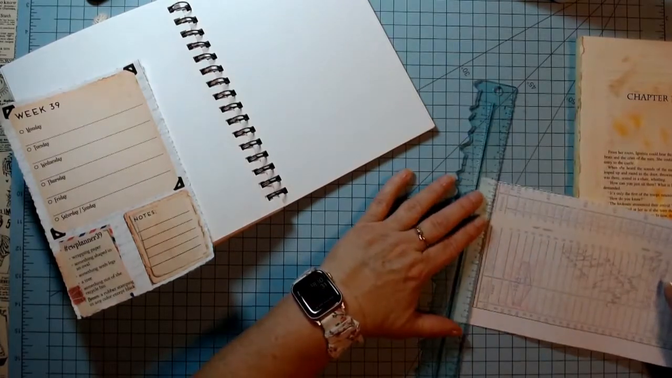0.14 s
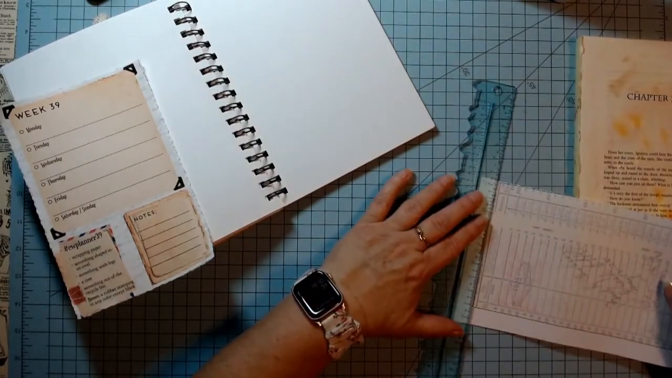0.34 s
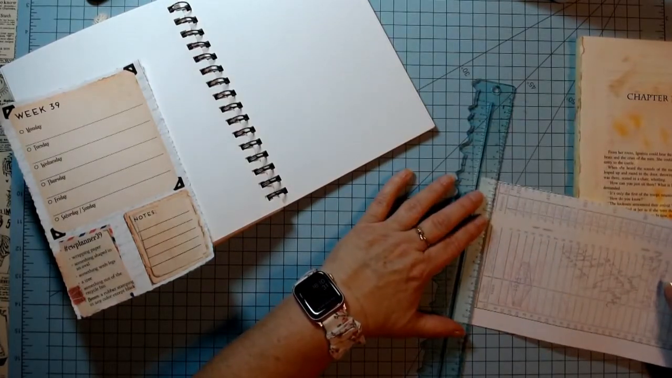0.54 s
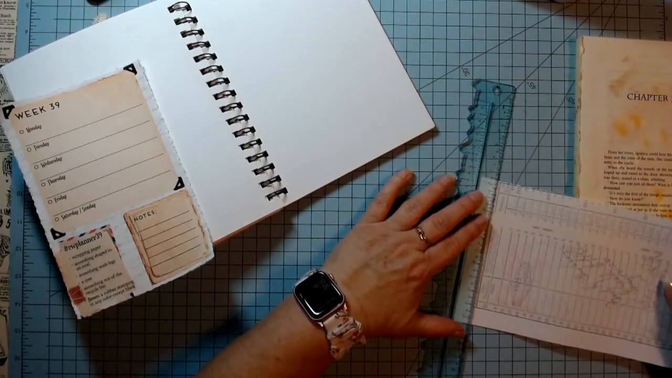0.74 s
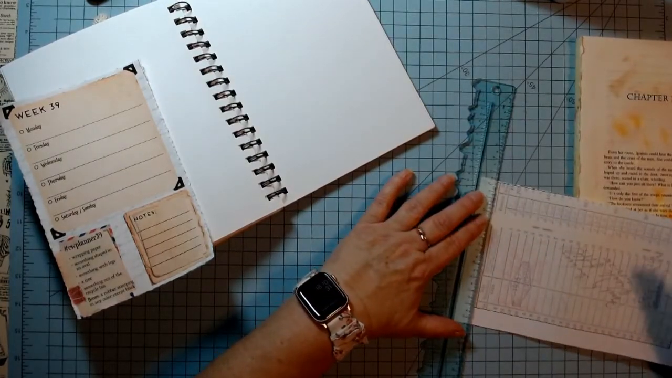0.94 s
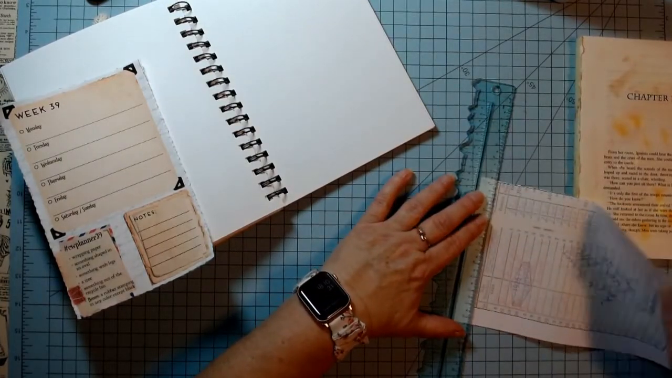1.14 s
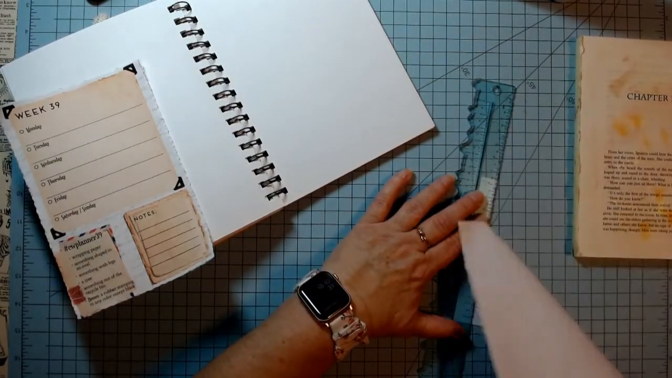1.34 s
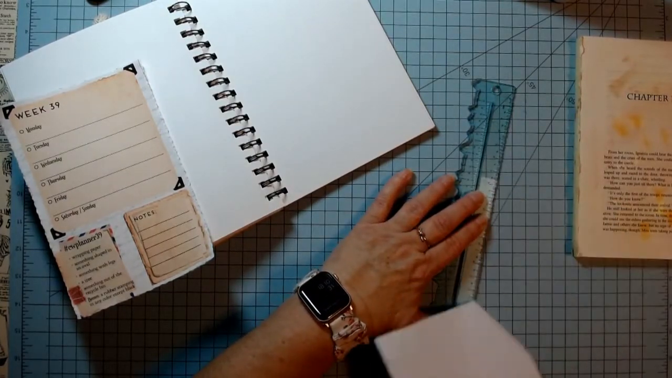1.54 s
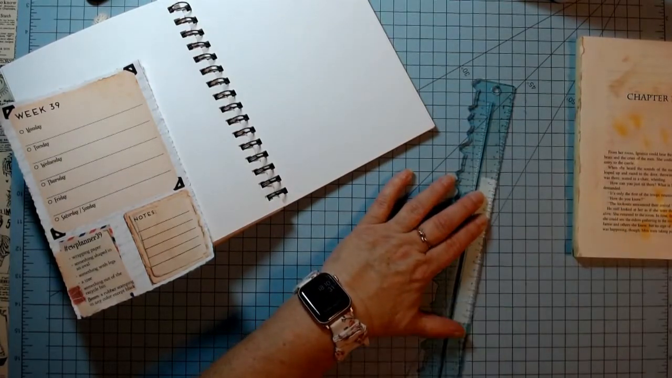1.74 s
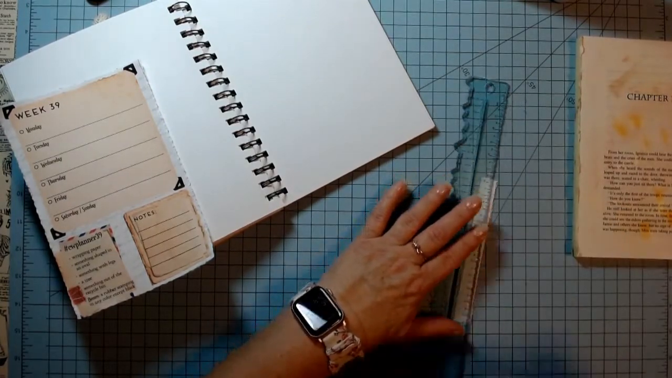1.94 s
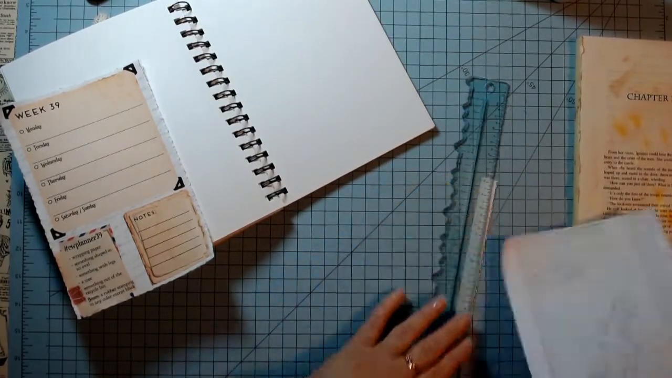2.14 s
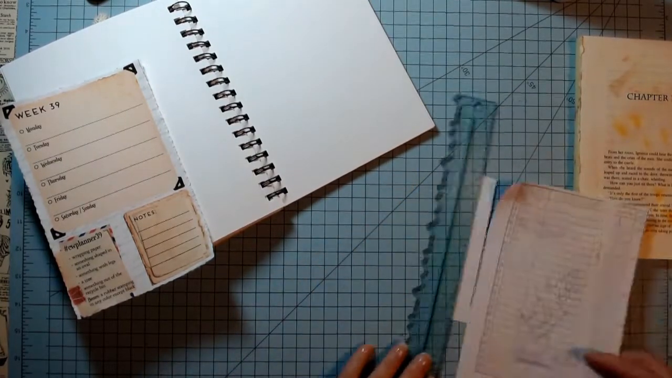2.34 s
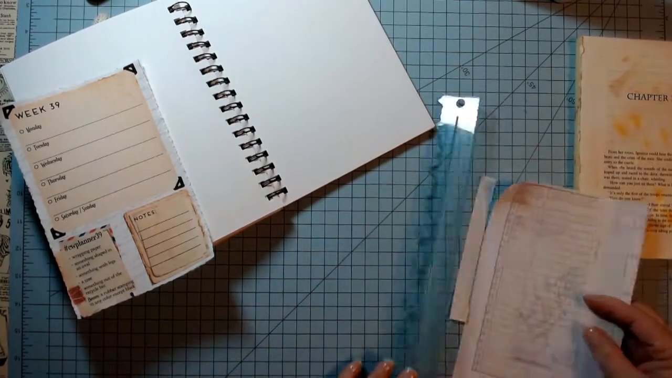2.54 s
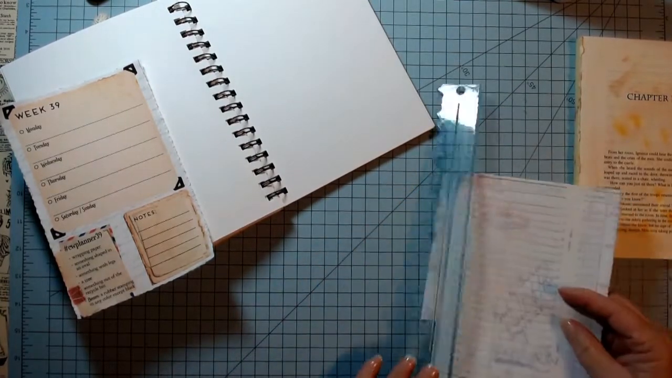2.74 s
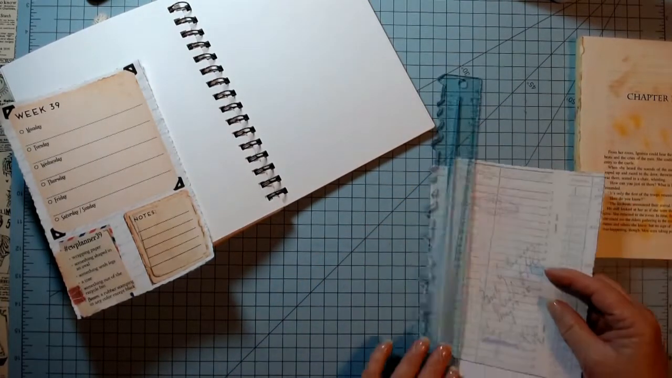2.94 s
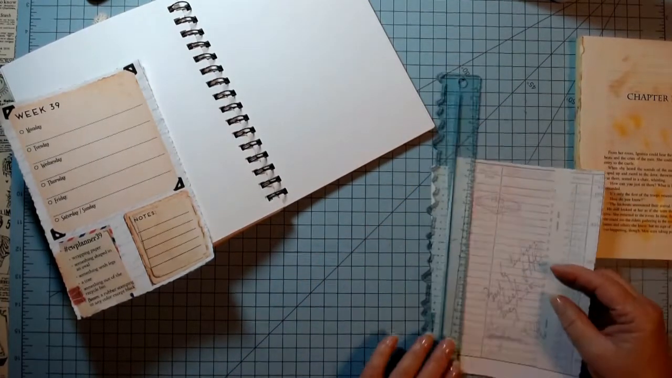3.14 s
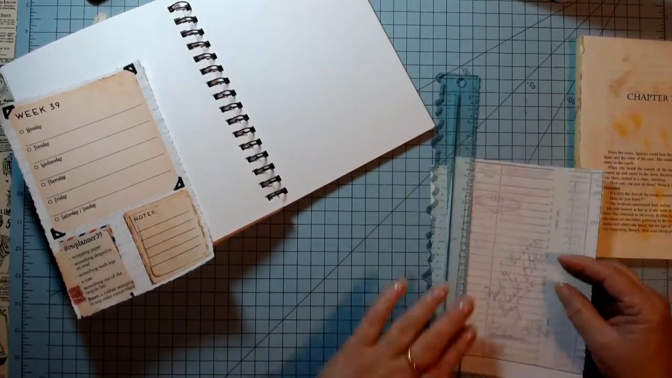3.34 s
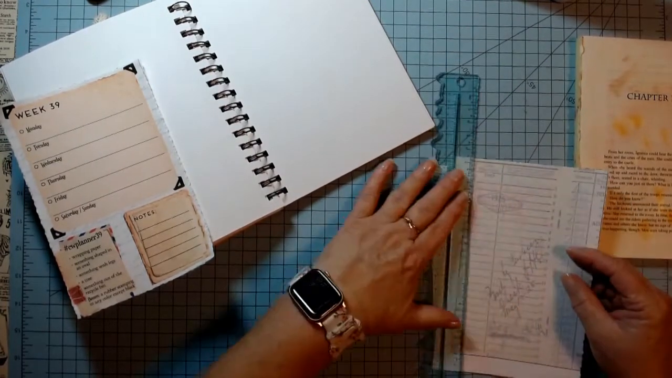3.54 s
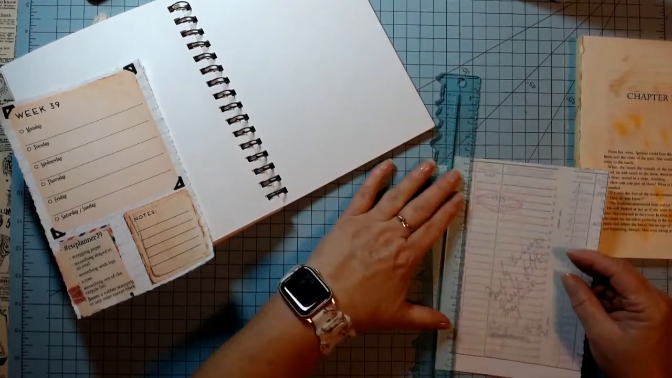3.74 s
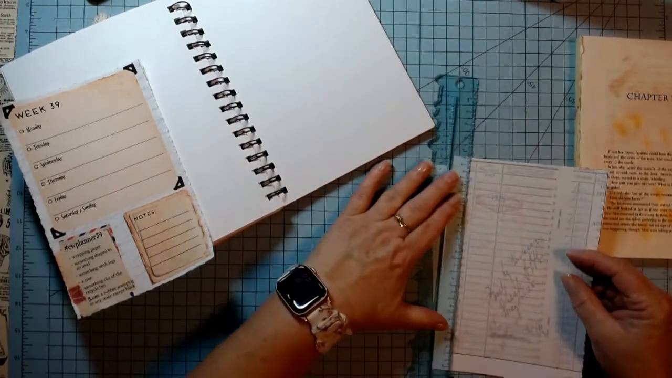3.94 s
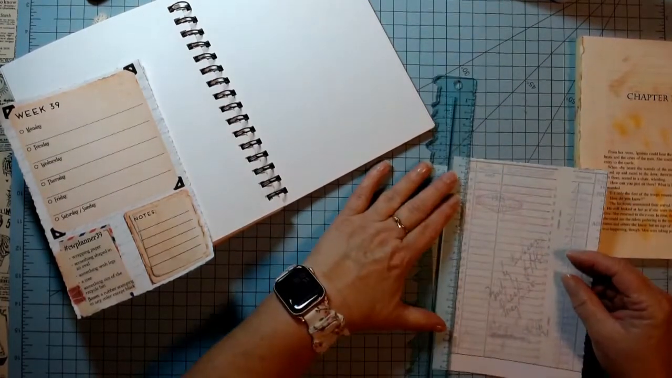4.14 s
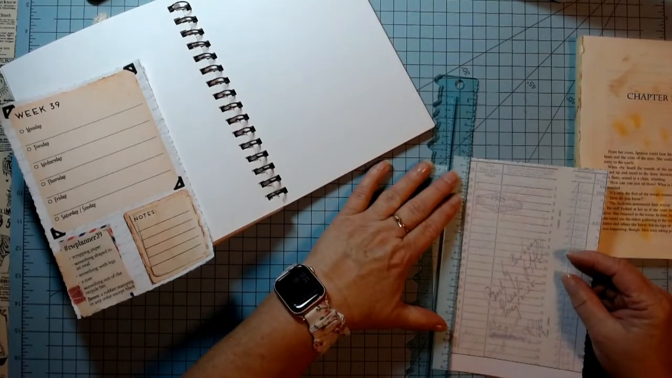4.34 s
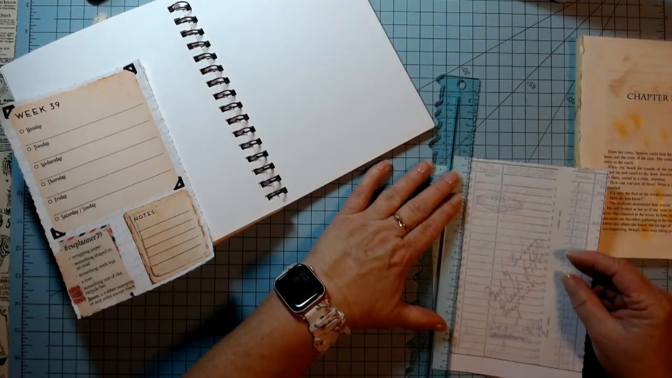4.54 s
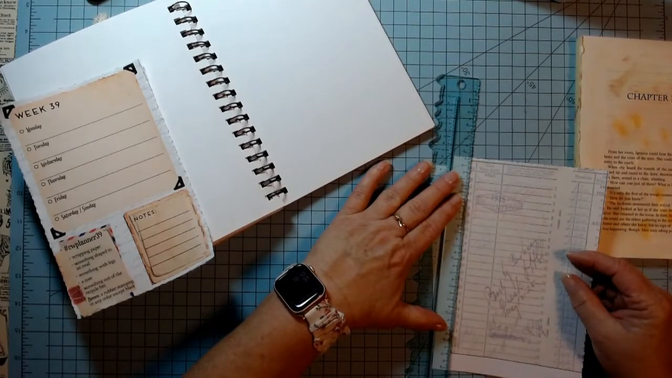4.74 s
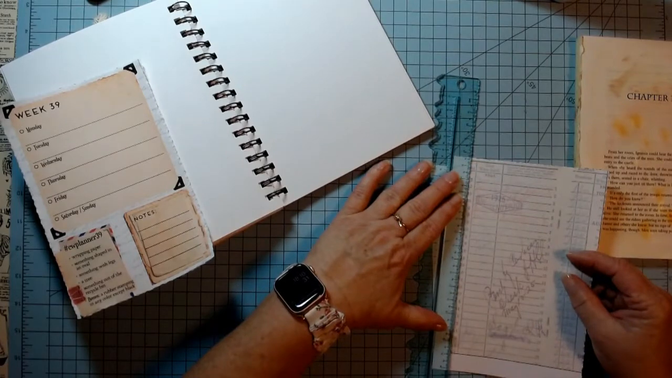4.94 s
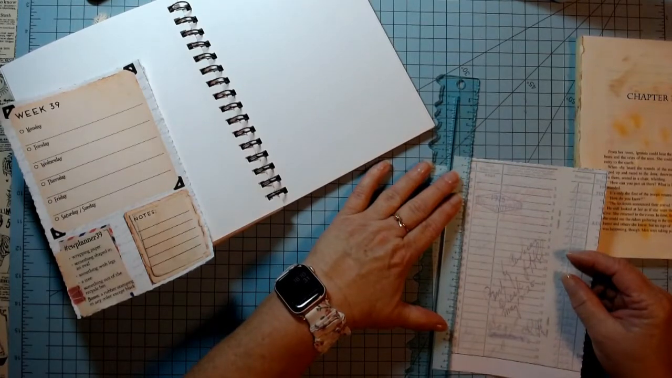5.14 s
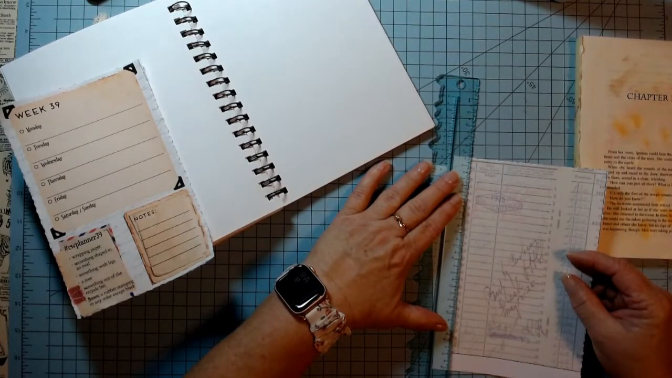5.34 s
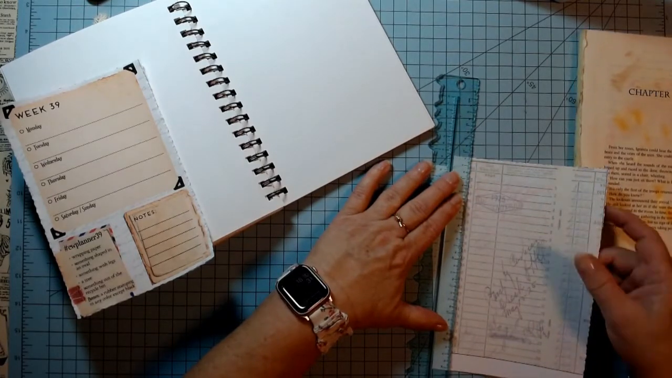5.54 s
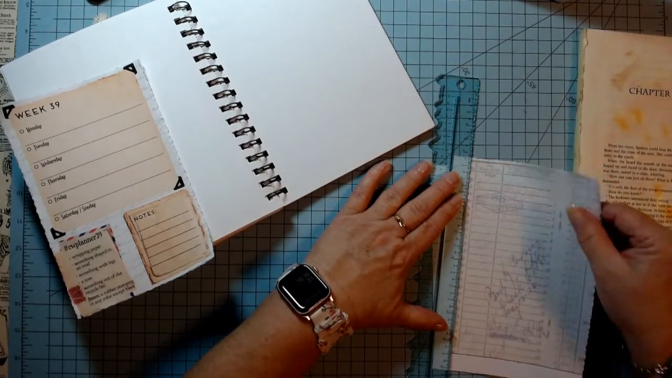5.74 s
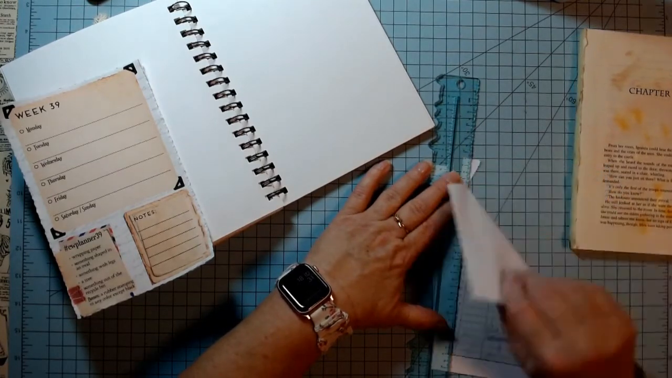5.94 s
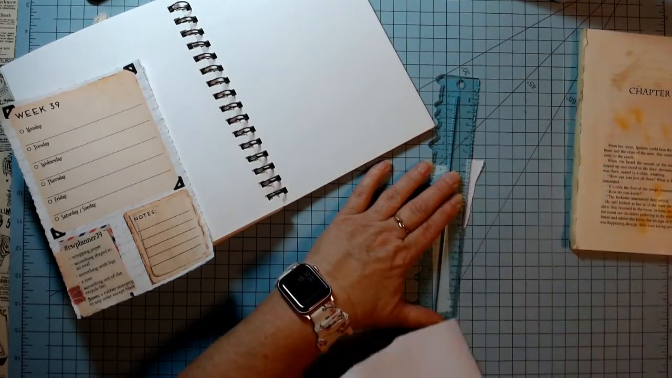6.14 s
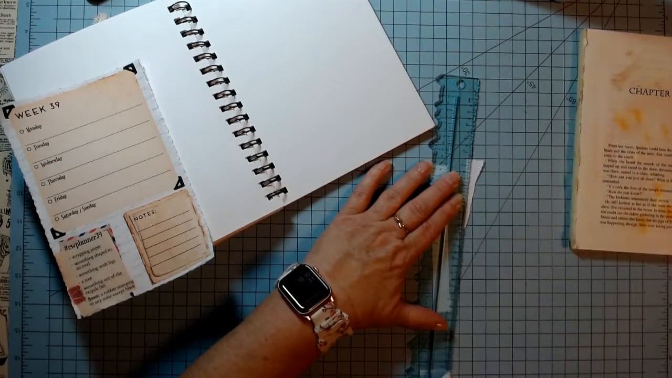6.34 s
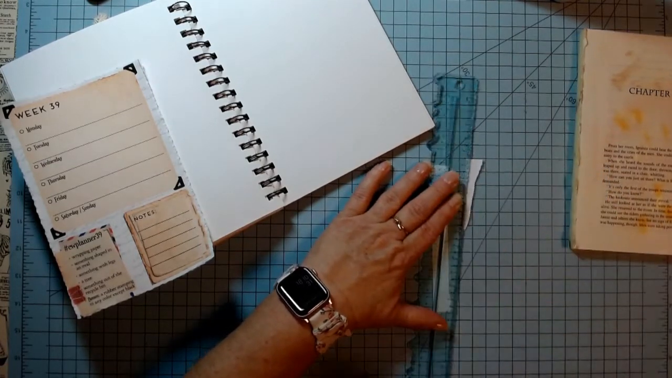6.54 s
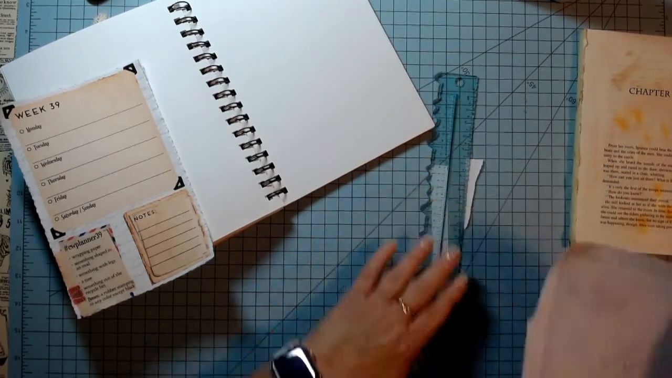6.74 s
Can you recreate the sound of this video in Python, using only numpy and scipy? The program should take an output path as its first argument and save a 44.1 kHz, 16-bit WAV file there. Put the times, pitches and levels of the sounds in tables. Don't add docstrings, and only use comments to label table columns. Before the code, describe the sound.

Close, dry paper tearing: one loud quick rip, small rustles, a single ruler clack, a pause, then a gentler two-part rip and faint rustle.

```python
import sys
import numpy as np
from scipy import signal
from scipy.fft import rfft, irfft, next_fast_len
from scipy.io import wavfile
from scipy.ndimage import uniform_filter1d

SR = 44100
rng = np.random.default_rng(int(sys.argv[2]) if len(sys.argv) > 2 else 0)


def gain_from_decibels(decibels):
    exponent = np.asarray(decibels, float) / 20
    return 10 ** exponent


def bounce(signal):
    frames = np.transpose(np.atleast_2d(signal))
    limited = np.clip(frames, -1, 1)
    pcm = np.round(limited * 32767).astype(np.int16)
    wavfile.write(sys.argv[1], SR, pcm)


N = 299483

# (time [s], crackle level [dB], slack of the sheet [dB])
TEARS = [
    [(1.204, -71, 9), (1.211, -19, -8), (1.245, -21, 0), (1.29, -22, -12), (1.334, -20.5, -5),
     (1.396, -26, -4.5), (1.482, -26, 0), (1.566, -31.5, 3), (1.66, -73.5, 20.5)],
    [(5.78, -53, 1), (5.792, -31.5, 2.5), (5.902, -22.5, 6), (5.944, -24, 2), (6.02, -30, 5),
     (6.056, -29, 5), (6.125, -46, 3)],
    [(6.128, -42, 5), (6.16, -41.5, 8.5), (6.168, -37, 12), (6.264, -42.5, 2), (6.354, -37.5, 4),
     (6.395, -34.5, -12.5), (6.45, -52, 17), (6.5, -74, 13)],
]
HANG_DB = [-4.5, 2, -1.5]
# (time [s], crackle [dB], time to fall 60 dB [s], slack [dB], thump [dB])
JOLTS = [(1.016, -62.5, 0.31, -12, 2), (1.124, -33.5, .14, 0.5, 2.5), (1.175, -66, 0.14, 24, 1.5),
         (1.705, -65, 0.082, 33, -5.5), (1.712, -43, 0.098, 21, -29.5), (1.864, -47.5, 0.14, 6, 3.5),
         (2.01, -41.5, 0.14, -12.5, -28), (2.27, -50.5, 0.35, -1.5, 2.5), (2.793, -59.5, 0.34, -11.5, -7),
         (2.902, -59.5, 0.37, -22, -4.5), (2.994, -35.5, 0.21, 1.5, 12), (3.044, -29.5, 0.053, 1.5, -21),
         (3.238, -73.5, 0.39, -4, 2), (3.435, -63.5, 0.28, -3, 10), (5.43, -41.5, 0.1, -16, 1),
         (6.527, -39, 0.13, -4, -1), (6.714, -61, 0.52, -1, 12.5)]
# (time [s], length [s], crackle [dB], slack [dB])
SLIDES = [(0.574, 0.11, -101, 22), (0.722, 0.092, -69.5, -26), (0.821, 0.12, -75, -12),
          (1.62, 0.14, -72.5, 15.5), (1.73, 0.13, -50.5, 7), (1.876, 0.18, -52.5, -10),
          (2.026, 0.092, -62.5, -17), (2.096, 0.14, -52.5, -5), (2.217, 0.076, -61, 2),
          (2.295, 0.1, -73, 8.5), (2.401, 0.23, -83.5, 10), (2.504, 0.16, -57, -22), (2.66, .1, -86, 15.5),
          (3.072, 0.12, -77, 0), (3.437, 0.072, -70.5, 8.5), (3.712, 0.077, -82.5, -5.5),
          (4.1, 0.52, -90, 7.5), (5.23, 0.092, -71.5, -10.5), (5.295, 0.26, -68, -4),
          (5.466, 0.21, -73, -13), (5.615, 0.071, -67, -7.5), (5.679, 0.15, -82.5, 12),
          (6.544, 0.28, -71, -7)]
RANGE_HZ = [220, 850, 2500, 6500]
# (frequency [Hz], level [dB per Hz])
PAPER = [(50, -27), (90, -19.5), (135, -6.5), (230, -9.5), (310, -3), (450, -7), (600, -5), (900, -2.5),
         (1700, -6), (3000, -8.5), (6500, -14.5), (8000, -26), (12000, -33), (16000, -34)]
TEAR_DB = [-5, -1.6, 1, -4]
TOUCH_DB = [-4, 1.23, 1, -5.5]
PER_SLACK = [0.14, 0.99, 0.14, 0.074]
# (time [s], peak level [dB], ring frequency [Hz])
SNAPS = [(1.13, -35, 1180), (1.132, -22, 490), (1.21, -11, 2830), (1.237, -8, 2860), (1.258, -7, 1604),
         (1.328, -5.5, 3360), (1.706, -32, 821), (1.717, -20, 732), (1.751, -27.5, 745),
         (1.785, -30.5, 880), (1.867, -36.5, 610), (2.281, -31, 1844), (3.441, -51, 1830),
         (3.469, -36, 452), (5.436, -31.5, 3715), (5.791, -13.5, 1243), (5.884, -6.5, 1100),
         (5.935, -21.5, 600), (6.13, -21, 990), (6.165, -18, 940), (6.529, -35, 1320), (6.715, -34.5, 2860)]
# (time [s], peak level [dB])
CLAPS = [
    (2.999, -20.5),
    (3.004, -11),
    (3.007, -23),
    (3.019, -47),
    (3.043, -20),
    (3.052, -43),
]
# (frequency [Hz], level [dB], time to fall 60 dB [s])
RULER = [(210, -7.5, 0.067), (670, -38, 0.17), (1390, -19, 0.069), (1710, -40, 0.17), (2070, -3, 0.36),
         (2690, 4, 0.0093), (4380, -40, 0.058)]
# (time [s], length [s],
# level [dB], frequency [Hz])
RUBS = [(0.613, 0.044, -78, 940), (2.373, 0.13, -79, 2400), (2.68, .07, -79, 2050), (2.8, .06, -70, 2700),
        (2.555, 0.061, -58, 2810), (2.901, 0.031, -62.5, 2690), (3.26, 0.089, -72, 2684),
        (3.431, 0.06, -59, 2074), (3.51, 0.092, -59.5, 378), (3.56, 0.077, -67, 507),
        (3.72, 0.076, -82.5, 2720), (5.141, 0.05, -64.5, 374), (5.233, 0.073, -70.5, 2726),
        (5.254, 0.23, -79.5, 5270), (5.29, 0.063, -73, 1450), (5.299, 0.06, -73.5, 2240),
        (5.493, 0.091, -73, 2670), (5.5, .18, -80, 5300), (1.215, .055, -30, 2837)]
# (time [s], length [s], level [dB], frequency [Hz])
FLAPS = [(1.295, 0.032, -25, 5470), (1.717, 0.019, -42, 2500), (2.275, 0.049, -50.5, 1800),
         (2.79, 0.12, -68.5, 4710), (3.239, 0.039, -71, 4800), (3.5, .06, -74, 2600),
         (5.422, 0.041, -47.5, 2800), (5.432, 0.025, -56, 7200), (5.624, 0.032, -63.5, 4650),
         (5.85, 0.19, -28.5, 510), (6.57, 0.13, -66.5, 2430), (6.715, 0.098, -50, 2900),
         (6.74, .05, -56, 4200)]
# (time [s], length [s], level [dB], frequency [Hz])
SWINGS = [(1.223, 0.28, -36, 127), (1.3, .099, -56.5, 75), (1.38, 0.25, -38, 170.6), (1.93, .06, -59, 110),
          (2.66, 0.087, -71.5, 520), (3.44, 0.11, -62, 142), (3.53, 0.13, -66, 480),
          (5.45, 0.053, -56, 219), (5.8, 0.23, -26.5, 137), (6.06, 0.16, -36, 201), (6.148, 0.11, -33, 75),
          (6.42, 0.093, -52, 150), (6.53, 0.09, -47, 179), (6.73, 0.041, -56, 495)]
# (time [s], left minus right [dB])
SIDE_DB = [(0.0, 0.5), (2.65, 0.5), (2.7, -4.5), (2.84, 1), (4.67, 3), (6.41, 0.5), (6.71, 0.5),
           (6.79, 0.5)]
# (frequency [Hz], time to fall 60 dB [s])
ROOM = [(100, 0.17), (500, 0.16), (2000, 0.12), (6000, 0.17), (15000, 0.35)]
# (frequency [Hz], left minus right [dB])
MICROPHONES = [(60, 1.6), (300, 1), (1200, 0.85), (2500, -0.85), (8000, -2)]
# (time [s], level [dB])
HUM = [(0.0, -60.5), (1.0, -62.5), (1.46, -51), (1.55, -62), (3.18, -56), (3.86, -63), (6.11, -59),
       (6.18, -54.5), (6.77, -59.5), (6.79, -71)]
# (frequency [Hz], level [dB per Hz])
AIR = [(45, -30), (70, -6.5), (95, -14.5), (142, -12), (260, -15), (350, -16), (430, -24), (800, -27.5),
       (1500, -35), (3700, -43), (6500, -44), (7600, -42.5), (8800, -59.5), (16000, -67.5)]
# (frequency [Hz], likeness [0 to 1])
ALIKE = [(60, 0.94), (180, 0.55), (550, 0.21), (1650, 0.15), (4970, 0.42), (15000, 0.059)]
# (time [s], level [dB])
CHIRP = [(0, -85.5), (5.0, -84.5), (6.79, -71)]
# (frequency [Hz], level [dB])
WHINES = [(4150, -101), (6500, -100), (7000, -102), (11900, -112)]


def paper():
    grain = fibres(per_s=6000, spread_db=2.4, clump_db=1.5, patchy_db=2.6, cycles=8.4, count=40)
    power = tears() + jolts() + slides()
    return (np.sqrt(power) * steadied(grain)).sum(0)


def tears():
    t = np.arange(N) / SR
    power = np.zeros((4, N))
    for rows, hang in zip(TEARS, HANG_DB):
        s, pull, slack = np.transpose(rows)
        on = (t >= s[0]) & (t < s[-1])
        pull_now, slack_now = np.interp(t[on], s, pull), np.interp(t[on], s, slack)
        power[:, on] += ranges(pull_now, slack_now, hang, TEAR_DB)
    return power


def jolts():
    power, rise_s = np.zeros((4, N)), 0.0071
    for s, db, t60, slack, thump in JOLTS:
        t = np.arange(int(t60 * SR)) / SR
        rise = np.minimum(t / rise_s, 1) ** 2
        add(power.T, s, (ranges(db - 60 * t / t60, slack, thump, TOUCH_DB) * rise).T)
    return power


def slides():
    power, pointedness, boom_db = np.zeros((4, N)), 1.2, -6.5
    for s, length, db, slack in SLIDES:
        t = np.arange(int(length * SR)) / SR
        swell = abs(np.sin(np.pi * t / length)) ** (2 * pointedness)
        add(power.T, s, (ranges(db, slack, boom_db, TOUCH_DB) * swell).T)
    return power


def fibres(per_s, spread_db, clump_db, patchy_db, cycles, count):
    patch = rng.integers(0, count, N)
    awake = rng.standard_normal((count, N // 256 + 1))
    awake = uniform_filter1d(awake, size=7, axis=1)
    awake = evened(uniform_filter1d(awake, size=2, axis=0))
    size_db = spread_db * np.minimum(rng.exponential(1, N), 4) + clump_db * wander(190)
    snap = gain_from_decibels(size_db + patchy_db * awake[patch, np.arange(N) // 256])
    snap *= (rng.random(N) < per_s / SR) * rng.choice([-1, 1], N)
    out = np.zeros(N)
    for k, hz in enumerate(np.geomspace(60, 15500, count)):
        tap = ring(hz, cycles / hz)[:int(40 * SR / hz)]
        tap = tap * np.sqrt(hz) / np.linalg.norm(tap)
        out += signal.oaconvolve(snap * (patch == k), tap)[:N]
    size = next_fast_len(N)
    hz = np.fft.rfftfreq(size, 1 / SR)
    shares = np.array([read(list(zip(RANGE_HZ, row)), hz) for row in np.eye(4)])
    return irfft(rfft(out, size) * gain_from_decibels(read(PAPER, hz)) * shares, size)[:, :N]


def ranges(crackle_db, slack_db, boom_db, taut_db):
    boom = np.eye(4)[:, :1] * boom_db
    return gain_from_decibels(crackle_db + np.c_[taut_db] + np.c_[PER_SLACK] * slack_db + boom) ** 2


def steadied(x):
    return x / np.sqrt(abs(uniform_filter1d(x ** 2, size=2600)) + 1e-20)


def snaps():
    out = np.zeros(N)
    for s, db, hz in SNAPS:
        add(out, s, gain_from_decibels(db - 1.0) * (ring(hz, t60=.023) + .5 * crack()))
    return out


def ruler_claps():
    out = np.zeros(N)
    for s, db in CLAPS:
        clap = 0
        for hz, tone_db, t60 in RULER:
            clap = clap + gain_from_decibels(tone_db) * ring(hz * rng.uniform(.96, 1.04), min(t60, .035))
        add(out, s, gain_from_decibels(db + 2.0) * (clap / abs(clap).max() + 0.73 * crack()))
    return out


def crack():
    dull = signal.butter(2, 4000, fs=SR)
    fall = gain_from_decibels(-60 * np.arange(6000) / SR / 0.011)
    return signal.lfilter(*dull, rng.standard_normal(6000)) * fall


def rubs_flaps_swings():
    out = np.zeros(N)
    for rows, sharpness in [(RUBS, 15), (FLAPS, 3.6), (SWINGS, 5.2)]:
        for s, length, db, hz in rows:
            add(out, s, rub(length, db, hz, sharpness))
    return out


def rub(length, db, hz, sharpness):
    noise = rng.standard_normal(20000)[:int(length * SR)]
    sound = signal.filtfilt(*signal.iirpeak(hz, sharpness, SR), noise)
    return gain_from_decibels(db) * evened(sound) * signal.windows.tukey(len(sound), .7)


def room(x):
    share = np.sin(np.pi * 4.3 * np.arange(N) / SR) ** 2
    out = np.zeros((2, N))
    for weight in (share, 1 - share):
        out += signal.oaconvolve((x * weight)[None], echoes(), axes=1)[:, :N]
    return out


def echoes():
    size, lag = SR // 3, 4
    taps = np.zeros((2, size))
    at = np.arange(40, size - 20, 20) + rng.integers(0, 20, (2, (size - 41) // 20))
    np.put_along_axis(taps, at, rng.choice([-1., 1.], at.shape), 1)
    taps *= 1 + 3.0 * np.exp(-np.arange(size) / SR / 0.018)
    hz, t, z = signal.stft(taps, SR, nperseg=256)
    alike = np.clip(1 - hz / 2000, 0, 1)[:, None]
    z[1] = alike * z[0] + np.sqrt(1 - alike ** 2) * z[1]
    fade = gain_from_decibels(-60 * t / read(ROOM, hz)[:, None])
    path = signal.istft(z * fade, SR, nperseg=256)[1][:, :size]
    path *= gain_from_decibels(5.0) / np.linalg.norm(path[0])
    path[[0, 1], [lag, 0]] += 1
    path = rfft(path, SR)
    path = path / np.sqrt(uniform_filter1d(abs(path) ** 2, size=70))
    microphones = gain_from_decibels(np.outer([.5, -.5], read(MICROPHONES, np.arange(SR // 2 + 1))))
    return irfft(microphones * path, SR)[:, :size]


def hum():
    t = np.arange(N) / SR
    turn = 2 * np.pi * np.cumsum(40.8 + 1.6 * wander(8.8)) / SR
    skew = .22 * wander(3)
    tone = np.sin([turn + skew, turn - skew]) * gain_from_decibels(2.2 * wander(14))
    return evened(tone) * gain_from_decibels(np.interp(t, *np.transpose(HUM)))


def air():
    frames, hz = N // 256 + 5, np.fft.rfftfreq(1024, 1 / SR)
    a, b, c, d, patches = rng.standard_normal((frames, 513, 5)).T
    patches = uniform_filter1d(patches, size=6, axis=0)
    patches = evened(uniform_filter1d(patches, size=20, axis=1))
    alike = np.clip(read(ALIKE, hz), -1, 1)[:, None]
    left, other = a + 1j * b, c + 1j * d
    z = np.array([left, alike * left + np.sqrt(1 - alike ** 2) * other])
    z *= gain_from_decibels(read(AIR, hz)[:, None] + 1.2 * patches) * (hz > 60)[:, None]
    return gain_from_decibels(-71) * evened(signal.istft(z, nperseg=1024, noverlap=768)[1][:, :N])


def electronics():
    frame_hz, frame_start_s, readout_s = 30.0, -.0015, .011
    t = np.arange(N) / SR
    done = np.clip(((t - frame_start_s) * frame_hz % 1) / frame_hz / readout_s, 0, 1)
    gate = signal.windows.tukey(100, .5)[(done * 99).astype(int)]
    turn = 2 * np.pi * np.cumsum(8000 - 400 * done ** 3 + 60 * wander(390)) / SR
    chirp = np.sin(turn) + gain_from_decibels(-16.5) * np.sin(3 / 2 * turn)
    chirp = chirp * gain_from_decibels(np.interp(t, *np.transpose(CHIRP)))
    band = signal.butter(2, [6400, 8200], "band", fs=SR, output="sos")
    buzz = gain_from_decibels(-83) * signal.sosfilt(band, rng.standard_normal(N))
    whines = np.zeros(N)
    for hz, db in WHINES:
        whines += gain_from_decibels(db) * np.sin(2 * np.pi * np.cumsum(hz + 12 * wander(40)) / SR)
    return gate * (chirp + buzz) + whines


def evened(x):
    return x / np.sqrt(np.mean(x ** 2) + 1e-20)


def read(points, hz):
    f, value = np.transpose(points)
    return np.interp(np.log(hz + 1), np.log(f + 1), value)


def add(mix, s, sound):
    part = mix[round(s * SR):][:len(sound)]
    part += sound[:len(part)]


def ring(hz, t60):
    t = np.arange(6000) / SR
    return np.sin(2 * np.pi * hz * t) * gain_from_decibels(-60 * t / max(t60, .002))


def wander(hz):
    pole = [1, -np.exp(-2 * np.pi * hz / SR)]
    return evened(signal.lfilter([1], np.convolve(pole, pole), rng.standard_normal(N)))


def scene():
    side_db = np.interp(np.arange(N) / SR, *np.transpose(SIDE_DB))
    hands = room(paper() + snaps() + ruler_claps() + rubs_flaps_swings())
    hands = hands * gain_from_decibels(np.array([side_db, -side_db]) / 2)
    machine = hum() * gain_from_decibels(np.array([[.4], [-.4]]))
    return hands + machine + air() + electronics()


def roll_off(x):
    return signal.sosfilt(signal.butter(12, 16450, fs=SR, output="sos"), x)


def record(dry):
    edge = signal.firwin(255, 16000, window=("kaiser", 9), fs=SR)
    mix = signal.oaconvolve(dry, edge[None], "same")
    return roll_off(mix)


dry = scene()
out = record(dry)
bounce(out)
```